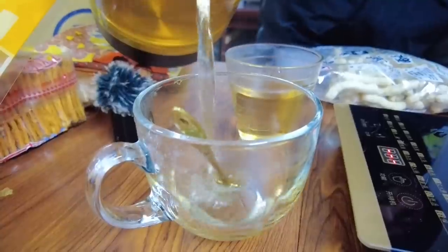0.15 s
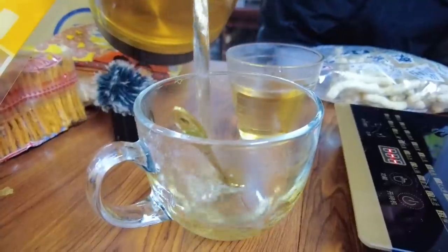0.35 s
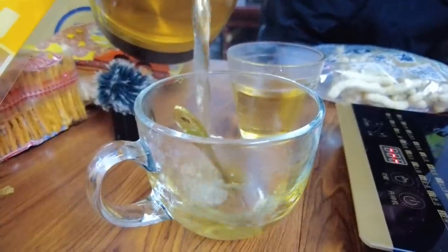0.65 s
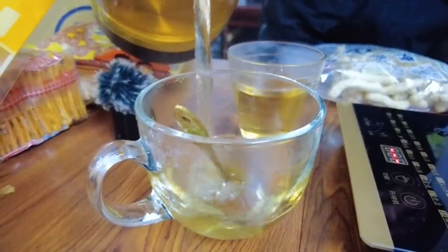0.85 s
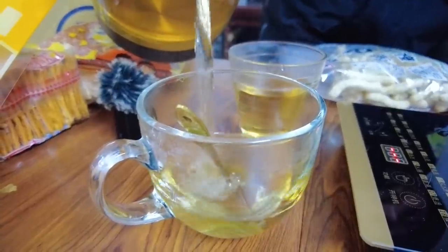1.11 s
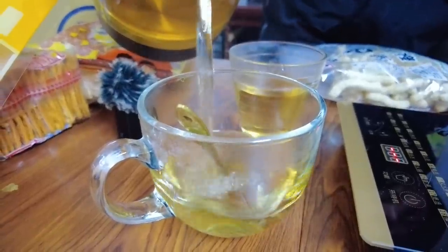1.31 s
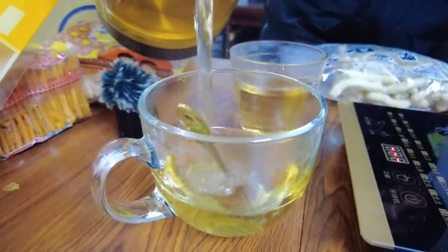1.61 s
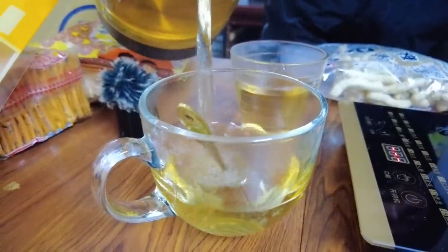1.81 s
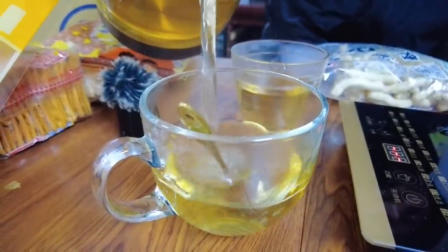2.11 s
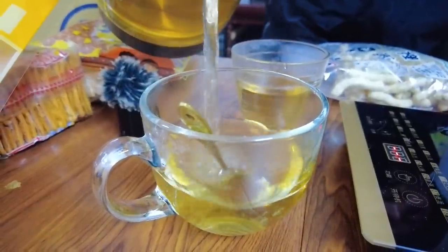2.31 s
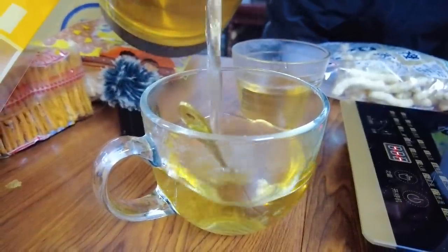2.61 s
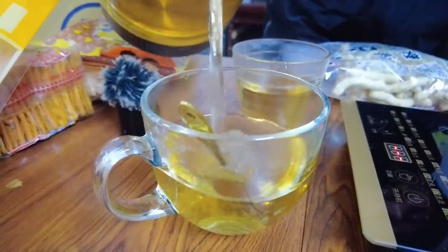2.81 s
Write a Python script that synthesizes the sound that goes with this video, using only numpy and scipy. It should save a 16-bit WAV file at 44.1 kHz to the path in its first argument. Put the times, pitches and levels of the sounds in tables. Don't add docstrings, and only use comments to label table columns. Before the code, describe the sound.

A close microphone catches a broken stream of hot tea filling a glass cup: quick bubbly glugs, wet splashes, faint spoon tinkles early and again later, dull wooden table knocks, low room hum, short soft reverb.

```python
import sys
import numpy as np
from scipy import signal
from scipy.fft import rfft, irfft, next_fast_len
from scipy.io import wavfile
from scipy.ndimage import uniform_filter1d, map_coordinates

SR = 44100
rng = np.random.default_rng(int(sys.argv[2]) if len(sys.argv) > 2 else 0)


def dump_mix(stems):
    frames = np.atleast_2d(stems).T
    limited = np.clip(frames, -1, 1)
    pcm = np.round(limited * 32767).astype(np.int16)
    wavfile.write(sys.argv[1], SR, pcm)


def linear_from_db(decibels):
    return 10 ** (np.asarray(decibels, float) / 20)


N = 130095

# pitch_hz, level_db [dB per Hz]
FIZZ_SPECTRUM = [(820, -28), (1400, -3.5), (2790, -5), (3490, -6), (7170, -8), (14900, -20.5), (16300, -39)]
# pitch_hz, level_db [dB per Hz]
HUM_SPECTRUM = [(13, -60), (22, 4.5), (97, 1), (424, -14.5), (968, -25.5), (1600, -35), (2080, -79),
                (3520, -120)]
# pitch_hz, width_hz, level_db
BOWL_MODES = [(1933, 315, 4.5), (2855, 114.5, 5.5), (4200, 450, 2.5), (7100, 1300, -31)]
# pitch_hz, width_hz, level_db
TABLE_MODES = [(84, 9.6, 5), (142, 57.4, -1.5), (264.5, 21, 4), (384.7, 36.5, 2.5), (457.7, 8.6, 2),
               (552.4, 57, 2), (684, 57, -4.5), (821, 41, -3.5), (1214, 276, -1.5)]
# start_s, flow_db, glug_length [cycles], table_weight_db
POUR_COURSE = [
    (0, -43, 4.8, -10),
    (.6, -49, 3.87, -1.5),
    (1.1, -41, 2.53, 0.5),
    (1.55, -63, 1.85, 16.5),
    (1.65, -47, 2.03, 5.5),
    (2.2, -46, 1.33, 3),
    (2.95, -39.5, 1.7, 1.5),
]
# start_s, pitch_hz
GLUG_PITCH = [
    (0, 1020),
    (.35, 947),
    (.5, 984),
    (1.1, 873),
    (2, 896),
    (2.95, 950),
]
# start_s, glug_db, knock_db, splash_db
LARGE_SLUGS = [(0.0396, -63, -56, -37), (0.0784, -26.5, -64, -42.5), (0.2747, -31.5, -60, -28.5),
               (0.2953, -30.5, -30, -34.5), (0.3461, -24, -43, -48), (0.3589, -21.5, -29, -49),
               (0.3981, -27.5, -55, -46), (0.4066, -23, -51, -46), (0.4413, -28, -55, -43),
               (0.5461, -25, -31, -41), (0.645, -13.5, -18.5, -34), (0.7156, -26.5, -23, -44),
               (0.7886, -31.5, -23, -39.5), (0.8643, -20, -27, -42), (0.8778, -29, -29, -64),
               (0.9408, -30, -29.5, -34.5), (1.0043, -24.5, -21.5, -63), (1.1173, -23.5, -18, -44),
               (1.2701, -27.5, -25.5, -44), (1.3139, -26.5, -19.5, -43), (1.3602, -13.5, -11, -32),
               (1.4953, -32.5, -25.5, -43.5), (1.5857, -13, -7.5, -35), (1.59, -50, -30, -34),
               (1.6033, -24, -16.5, -45),
               (1.64, -22, -21, -44), (1.6715, -32, -18.5, -46.5), (1.7509, -33, -21.5, -46.5),
              (1.8317, -28, -16.5, -46), (1.8739, -30, -18.5, -34), (1.8986, -28.5, -21.5, -37.5),
              (2.001, -26, -21.5, -39), (2.021, -25, -16.5, -59), (2.1332, -28, -21.5, -43),
              (2.231, -29, -18.5, -31), (2.2511, -20.5, -28, -43.5), (2.3163, -26.5, -22, -46),
              (2.3547, -29, -25.5, -48), (2.3959, -25.5, -19.5, -27), (2.4361, -25, -24, -45),
              (2.469, -30.5, -22, -38.5), (2.5713, -24.5, -26, -52), (2.6024, -25, -24.5, -78),
              (2.6699, -28, -24.5, -45), (2.702, -25, -23, -35.5), (2.7377, -29, -65.5, -35),
              (2.789, -56.5, -24, -58), (2.816, -63, -28, -28), (2.8962, -29.5, -28.5, -38),
              (2.9404, -26.5, -37, -56)]
# start_s, level_db, pitch_hz
LONE_BUBBLES = [(0.048, -40, 1040), (0.102, -31.5, 980), (0.15, -39, 960), (0.184, -33.5, 900),
                (0.248, -31.5, 785), (0.316, -32.5, 725), (0.371, -32, 867), (0.387, -34, 1010),
                (0.532, -32, 1050), (0.568, -34, 1075), (0.58, -30, 1030), (0.602, -27.5, 950),
                (0.667, -31, 1020), (0.737, -32.5, 930), (0.831, -29.5, 980), (0.904, -29.5, 840),
                (0.959, -33, 807), (0.983, -33, 1110), (1.066, -44, 764), (1.092, -42, 840),
                (1.151, -34, 964), (1.166, -37, 1080), (1.194, -31, 950), (1.229, -26, 820),
                (1.344, -29, 1020), (1.352, -22, 830), (1.393, -30, 800), (1.433, -29.5, 796),
                (1.453, -30.5, 740), (1.708, -27.5, 800), (1.849, -30.5, 820), (1.921, -28, 930),
                (1.946, -32, 960), (1.984, -37, 775), (2.042, -32, 970), (2.162, -31, 970),
                (2.298, -26.5, 821), (2.485, -25, 870), (2.514, -32.5, 1080), (2.538, -33.5, 776),
                (2.747, -28, 750), (2.767, -40, 719), (2.863, -36.5, 1050)]
# start_s, level_db, pitch_hz
LONE_SPLASHES = [(0.0084, -33, 2650), (0.2021, -41, 2200), (0.3392, -34, 2700), (0.413, -40, 2660),
                 (0.7747, -36, 2600), (1.0665, -45, 2670), (1.2107, -37, 2670), (1.2768, -38.5, 2680),
                 (1.3506, -31.5, 3020), (1.393, -36, 2070), (1.4337, -41, 2680), (1.709, -47, 2060),
                 (1.7556, -49, 2640), (2.0601, -35.5, 2600), (2.6214, -35, 2700), (2.6354, -41, 2940),
                 (2.6574, -32.5, 2700), (2.794, -40.5, 2870)]
# start_s, level_db
BRIGHT_DROPS = [(0.038, -42), (0.2687, -19.5), (0.3736, -36.5), (0.5793, -33.5), (0.7123, -35),
                (0.7876, -25), (0.9853, -38.5), (1.266, -31.5), (1.3544, -29.5), (1.4945, -34),
                (1.708, -38.5), (1.8704, -33.5), (1.8963, -33.5), (1.9983, -31.5), (2.228, -39),
                (2.395, -24.5), (2.6577, -32.5), (2.6986, -38), (2.7384, -36), (2.8936, -31.5)]
# start_s, level_db, upper_modes_db
SPOON_HITS = [(0.0772, -37.5, -4), (0.243, -26, -2.5), (0.3076, -24, -2.5), (0.3178, -25.5, -6.5),
              (0.3354, -31.5, -2), (0.6427, -27.5, -1.5), (0.714, -39.5, -1.5), (0.8637, -45, 3.5),
              (1.1154, -38, -6), (1.363, -29.5, -5), (1.5864, -24.5, -4), (1.5927, -24.5, 1.5),
              (1.6744, -44.5, -8), (2.2584, -32, -1.5), (2.5407, -31.5, -2), (2.5673, -32.5, -11),
              (2.5923, -42, 2), (2.6126, -37, -4), (2.719, -46, 2), (2.7645, -37, -2)]
# pitch_hz, level_db, t60_s
GLASS_LOW_MODES = [(1367, -17, .08), (1534, -18, .1), (3330, -17, .16), (4850, -15, .03), (5270, -14, .04),
                   (5565, -12, .1), (5760, -8, .04), (5940, -1, .07)]
# pitch_hz, level_db, t60_s
GLASS_HIGH_MODES = [(6950, -5, .06), (7140, -9, .12), (8565, -11, .1), (10080, -15, .1), (14330, -21, .05)]


def unit(x):
    return x / np.sqrt(np.mean(x ** 2) + 1e-20)


def smooth_twice(x, size):
    return uniform_filter1d(uniform_filter1d(x, size, axis=1), size, axis=1)


def along(points, hz):
    pitch_hz, level_db = np.transpose(points)
    return np.interp(np.log(hz + 1), np.log(pitch_hz + 1), level_db)


def filtered(x, response):
    size = next_fast_len(N + SR // 2)
    return irfft(rfft(x, size) * response(np.fft.rfftfreq(size, 1 / SR)), size)[..., :N]


def body(modes):
    def response(f):
        total = 0
        for k, (hz, width, level_db) in enumerate(modes):
            sign = (-1) ** k
            total = total + sign * linear_from_db(level_db) * 1j * f * width / (hz * hz - f * f + 1j * f * width)
        return total
    return response


def place(start_s, shapes):
    first = np.round(start_s * SR).astype(int)[:, None]
    at = np.clip(first + np.arange(shapes.shape[1]), 0, N)
    return np.bincount(at.ravel(), shapes.ravel(), N + 1)[:N]


def floor():
    def shaped(points, swell):
        ends = [(11, -99)] + points + [(20000, -120)]
        return unit(filtered(swell * rng.standard_normal(N), lambda f: linear_from_db(along(ends, f))))

    wander = map_coordinates(rng.standard_normal(N // 300), [np.arange(N) / 400])
    fitful = linear_from_db(5 * np.tanh(wander))
    shimmer = unit(filtered(fitful * fitful * rng.standard_normal(N), body(BOWL_MODES[:2])))
    fizz = shaped(FIZZ_SPECTRUM, fitful)
    hum = shaped(HUM_SPECTRUM, 1)
    return linear_from_db(-70) * shimmer + linear_from_db(-62) * fizz + linear_from_db(-47.5) * hum


def bowl(start_s, shapes):
    rise, wander = 0.07, 0.03
    fill = 3 * start_s * SR / N + wander / rise * 3 * rng.standard_normal(len(start_s))
    step = np.round(np.clip(fill, 0, 3))
    ring = 0
    for k in range(4):
        splashes = place(start_s[step == k], shapes[step == k])
        stretch = 1 + rise * (k / 3 - 0.5)
        ring = ring + filtered(splashes, lambda f: body(BOWL_MODES)(f / stretch))
    return ring


def table(start_s, knock_db, scatter):
    softness_hz = 1020
    spot = rng.integers(-1, 2, len(start_s))
    ring = 0
    for k in (-1, 0, 1):
        blows = place(start_s[spot == k], linear_from_db(knock_db)[spot == k, None])
        detune = 1 + k * scatter / 2
        ring = ring + filtered(blows, lambda f: body(TABLE_MODES)(f * detune) / (1 + 1j * f / softness_hz) ** 4)
    return ring


def slugs(start_s, glug_db, knock_db, splash_db, scatter, glug_hz=None, splash_hz=None):
    glug_rise = 0.11
    t = np.arange(SR // 40) / SR - SR // 80 / SR
    r = scatter * rng.standard_normal((len(start_s), 4))
    if glug_hz is None:
        glug_hz = np.interp(start_s, *np.transpose(GLUG_PITCH)) * np.exp(r[:, 0])
    if splash_hz is None:
        splash_hz = (2300 + 270 * start_s) * np.exp(2 * r[:, 3])
    glug_hz, splash_hz = glug_hz[:, None], splash_hz[:, None]

    when, _, cycles, _ = np.transpose(POUR_COURSE)
    cycles = np.clip(np.interp(start_s, when, cycles)[:, None] * np.exp(2 * r[:, 1:2]), 0.6, 8)
    u = t / (cycles / glug_hz / 2)
    slide = 1 + (glug_rise + r[:, 2:3]) * u / 2
    glug = linear_from_db(glug_db)[:, None] * np.exp(-u ** 2) * np.cos(2 * np.pi * glug_hz * t * slide)

    grit = np.exp(-(t * splash_hz / 1.6) ** 2) * np.cos(2 * np.pi * splash_hz * t)
    splash = bowl(start_s + t[0], linear_from_db(splash_db)[:, None] * grit / 9)
    knocks = table(start_s - 0.001, knock_db, scatter)
    return place(start_s + t[0], glug) + knocks + splash


def ticks(start_s, level_db, wide):
    drop_t60_s, mist_t60_s, mist_db, attack_s = 0.017, 0.18, -40, 0.00043
    t = np.arange(SR // 9) / SR
    decay = linear_from_db(-60 * t / drop_t60_s) + linear_from_db(mist_db - 60 * t / mist_t60_s)
    fade = linear_from_db(level_db)[:, None] * decay * (1 - np.exp(-t / attack_s))
    noise = rng.standard_normal(fade.shape)
    hz = 7400 * np.exp(0.26 * (1 - wide) * rng.standard_normal((len(start_s), 1)))
    band = 4 * smooth_twice(noise, 9) * np.cos(2 * np.pi * hz * t)
    hiss = place(start_s, fade * (wide * noise + (1 - wide) * band))
    return filtered(hiss, body([(3930, 990, -2.5), (7080, 1070, 5), (9890, 1500, 0), (14200, 1500, -8.5)]))


def patter(count):
    when, flow_db, _, weight_db = np.transpose(POUR_COURSE)
    start_s = np.sort(rng.random(count)) * N / SR
    spread = np.clip(rng.standard_normal((count, 4)), -3, 1.5)
    spread_db = 8 * spread @ (np.eye(4) * 0.93 + 0.038)
    level_db = np.interp(start_s, when, flow_db) - 6.5
    knock_db = level_db + np.interp(start_s, when, weight_db) + 36.5 + spread_db[:, 1]
    splash_db = level_db + 14 + spread_db[:, 2]
    small = slugs(start_s, level_db + spread_db[:, 0], knock_db, splash_db, scatter=0.1)
    spray_db = level_db - 12 + 1.5 * spread_db[:, 3]
    return small + ticks(start_s[::2], spray_db[::2], wide=0.3)


def stream():
    swell_s = 0.001944
    s, db, knock_db, splash_db = np.transpose(LARGE_SLUGS)
    large = slugs(s, db, knock_db + 33, splash_db + 25, scatter=0.03)
    s, db, hz = np.transpose(LONE_BUBBLES)
    bubbles = slugs(s + swell_s, db - 0.5, db + 27.5, db + 6.5, scatter=0.049, glug_hz=hz)
    s, db, hz = np.transpose(LONE_SPLASHES)
    splashes = slugs(s + swell_s / 2, db - 20, db, db + 20.5, scatter=0.04, splash_hz=hz)
    return large + bubbles + splashes + patter(count=1400)


def spoon():
    crack_hz, crack_db, crack_t60_s = 5100, -4, 0.02
    drown_s, attack_s = 0.026, 0.00057
    start_s, hit_db, upper_db = np.array(SPOON_HITS).T[:, :, None]
    t = np.arange(SR // 10) / SR
    shape = (len(start_s), len(t))

    crack = unit(uniform_filter1d(rng.standard_normal(shape), size=20)) * np.cos(2 * np.pi * crack_hz * t)
    ring = linear_from_db(crack_db - 60 * t / crack_t60_s) * crack
    for modes, lift_db in ((GLASS_LOW_MODES, 0), (GLASS_HIGH_MODES, upper_db)):
        for hz, level_db, t60_s in modes:
            r = rng.standard_normal((len(start_s), 2))
            fade = linear_from_db(level_db + lift_db + 2 * r[:, :1] - 60 * t / t60_s)
            tone = np.sin(2 * np.pi * hz * t * (1 + r[:, 1:] / 350))
            chatter = linear_from_db(3 * unit(smooth_twice(rng.standard_normal(shape), 160)))
            ring = ring + fade * tone * chatter

    drowned = ring / (1 + (t / drown_s) ** 4) * (1 - np.exp(-t / attack_s))
    clinks = place(start_s[:, 0], linear_from_db(hit_db - 3) * drowned)
    return filtered(clinks, lambda f: 1j * f / (800 + 1j * f))


def room(x):
    t60_s = 0.32
    t = np.arange(SR // 4) / SR
    tail = rng.standard_normal(len(t)) * linear_from_db(-60 * t / t60_s)
    return linear_from_db(-11.5) * signal.fftconvolve(x, tail / np.linalg.norm(tail))[:N]


def scene():
    near = stream() + ticks(*np.transpose(BRIGHT_DROPS), wide=0.8)
    glass = spoon()
    mono = floor() + near + glass + room(near + glass / 2)
    mono = filtered(mono, lambda f: f < 16250)
    return np.array([mono, mono])


def top_cut(x):
    return signal.sosfilt(signal.butter(12, 16500, fs=SR, output="sos"), x)


def record(dry):
    apart_hz, apart_db, apart_share, quiet_db, holes_hz = 2900, -6, 0.1, -42, 12000
    hz, _, z = signal.stft(dry[0], SR, nperseg=1024)
    steady = np.exp(uniform_filter1d(np.log(np.abs(z) + 1e-9), 20, 0))

    def tiles():
        grains = rng.standard_normal((18, z.shape[1] // 2 + 1))
        grains = unit(uniform_filter1d(uniform_filter1d(grains, 2, 0), 2, 1))
        return np.repeat(np.repeat(grains, 30, 0), 2, 1)[:len(hz), :z.shape[1]]

    quiet = np.sqrt((np.abs(z[40:]) ** 2).sum(0)) < linear_from_db(quiet_db)
    patch = (tiles() > -apart_share) * (hz > apart_hz)[:, None] * quiet
    faint = steady < 2 * np.median(steady, 1)[:, None]
    keep = 1 - (tiles() > 0) * (hz > holes_hz)[:, None] * faint
    noise = signal.stft(rng.standard_normal(N), SR, nperseg=1024)[2]
    side = linear_from_db(apart_db) * steady * patch * noise / np.abs(noise).mean()
    mid, side = signal.istft(np.array([z, side]) * keep, SR, nperseg=1024)[1][:, :N]
    return top_cut(np.array([mid + side, mid - side]))


dry = scene()
out = record(dry)
dump_mix(out)
```